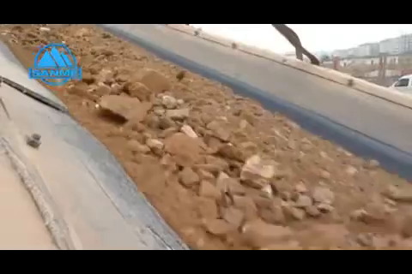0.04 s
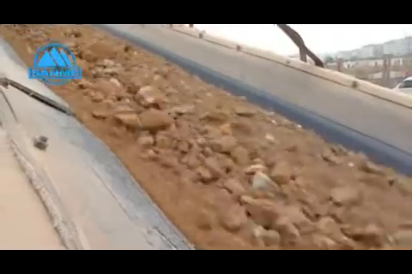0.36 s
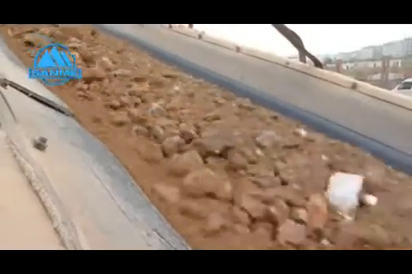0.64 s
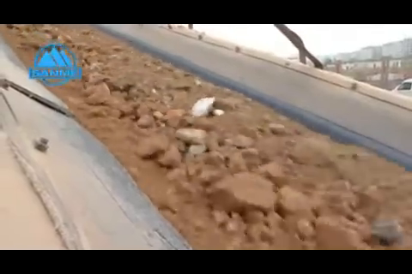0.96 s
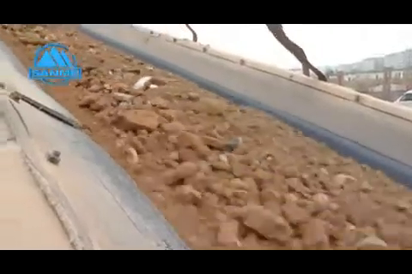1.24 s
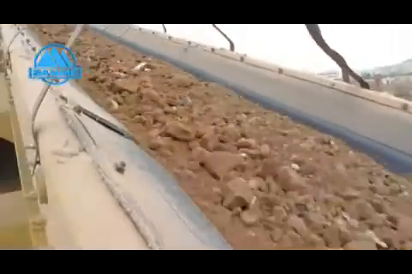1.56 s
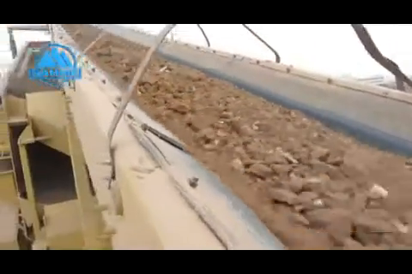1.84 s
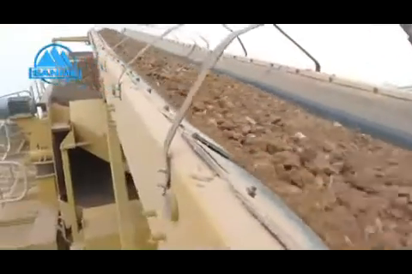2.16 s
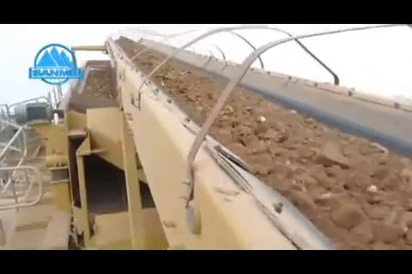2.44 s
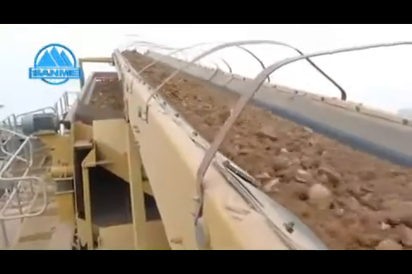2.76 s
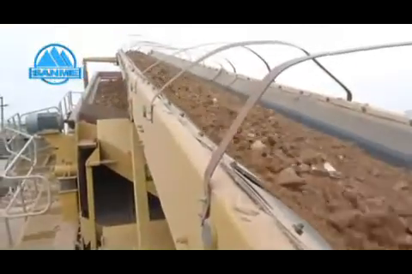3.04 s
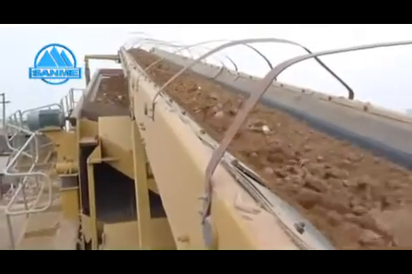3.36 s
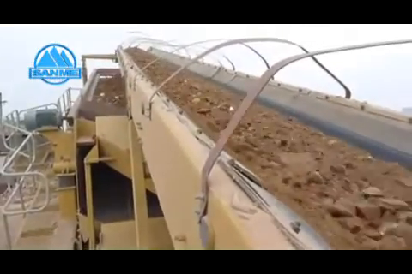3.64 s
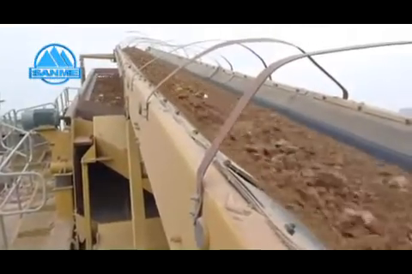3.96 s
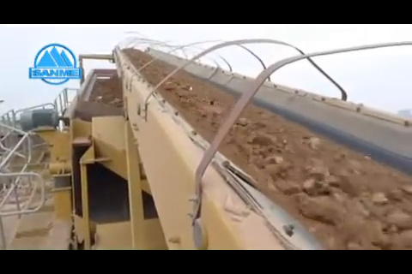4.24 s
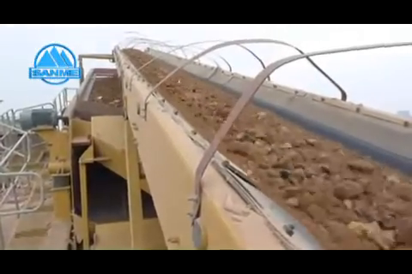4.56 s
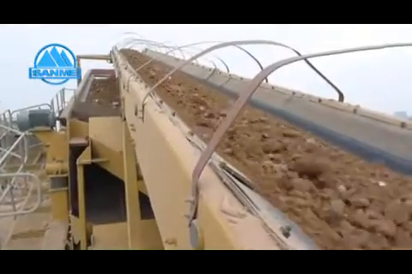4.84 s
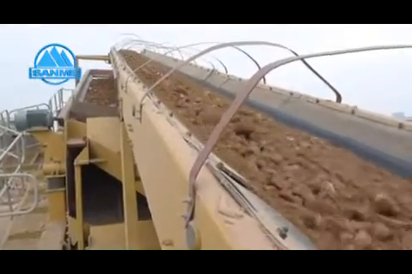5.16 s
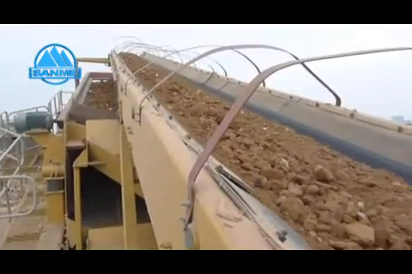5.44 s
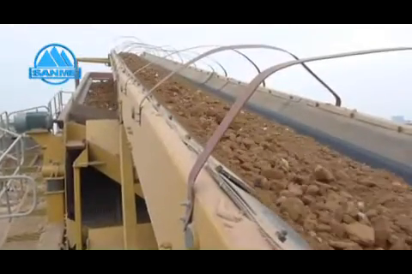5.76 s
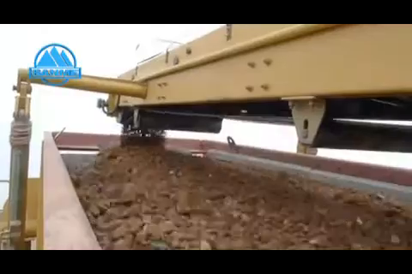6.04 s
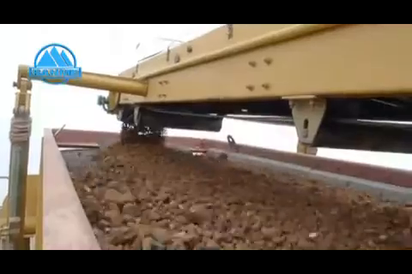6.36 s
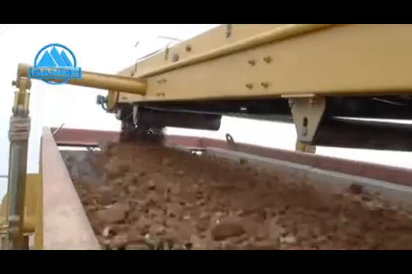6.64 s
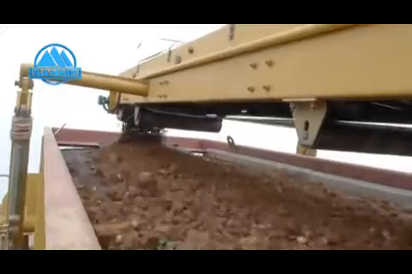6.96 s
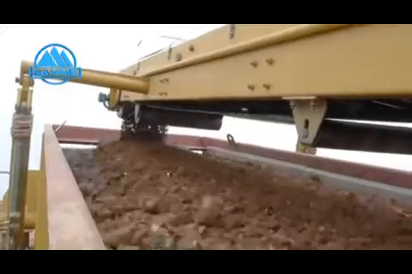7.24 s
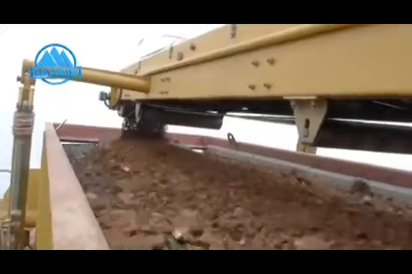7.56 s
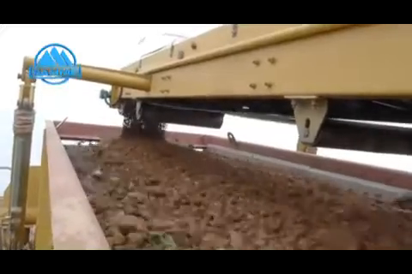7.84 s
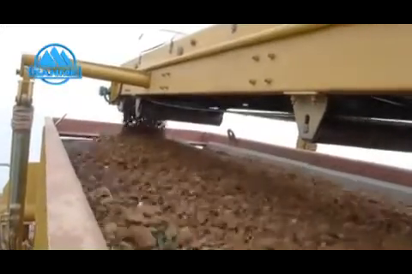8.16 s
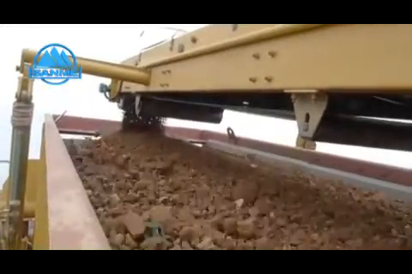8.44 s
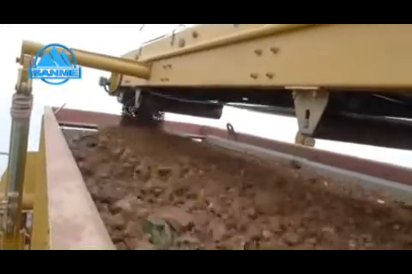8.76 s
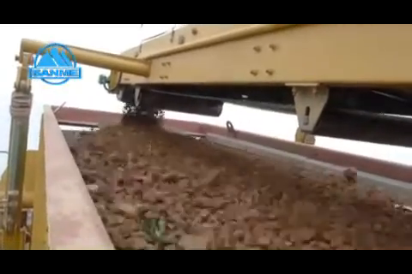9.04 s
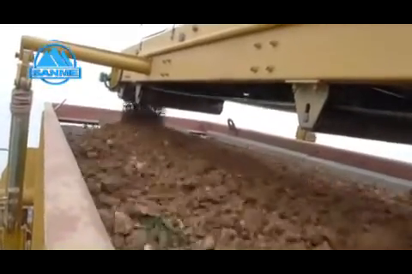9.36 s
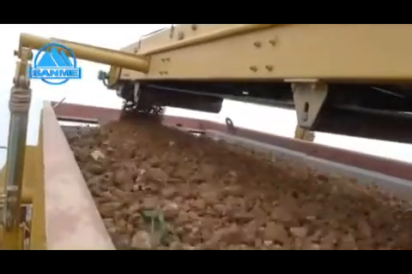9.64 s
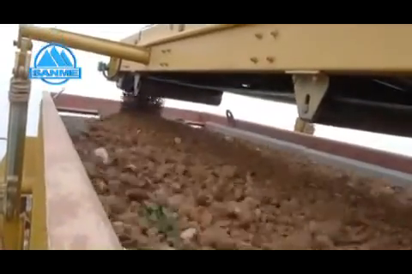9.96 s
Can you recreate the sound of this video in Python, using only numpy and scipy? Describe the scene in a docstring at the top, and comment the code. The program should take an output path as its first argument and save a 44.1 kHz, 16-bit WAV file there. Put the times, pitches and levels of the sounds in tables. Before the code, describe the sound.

A crushing plant roars steadily outdoors while rocks and gravel rattle in a fast rhythm on a shaking steel screen.

```python
"""Rock crusher and shaking screen

A mobile crushing plant, heard beside its feed belt and then, from 6.1 s, close to the vibrating screen.
The screen tosses rubble about 16.6 times a second: rocks drum on the steel box, gravel crackles on the
deck and the mesh jingles, over the crusher's steady roar. By the belt, rollers rumble, the drive drones
and a loose fitting chinks on every second stroke. The sound stutters just before the change of place."""
import sys
import numpy as np
from scipy import signal
from scipy.fft import rfft, irfft, next_fast_len
from scipy.io import wavfile
from scipy.ndimage import uniform_filter1d

SR = 44100
rng = np.random.default_rng(int(sys.argv[2]) if len(sys.argv) > 2 else 0)


def bounce(signal):
    """Save signal as a 16-bit WAV file at the path given by the first command-line argument."""
    frames = np.transpose(np.atleast_2d(signal))
    limited = np.clip(frames, -1, 1)
    pcm = np.round(limited * 32767).astype(np.int16)
    wavfile.write(sys.argv[1], SR, pcm)


N = 440559
TIME = np.arange(N) / SR
STROKE_HZ = 16.58
TURN_S, TURN_LENGTH_S = 1.24, 0.7  # the listener turns from the belt towards the screen
AT_SCREEN_S = 6.097  # the listening place jumps to the screen

# tone of the rubble at the screen and beside the belt: f/Hz, gain/dB
SCREEN_EQ = [(50, -52), (95, -28.5), (190, -20), (280, -6.5), (450, -1.5), (670, -2.5), (850, -5.5),
             (1300, -3.5), (1900, -5), (2600, -5), (4000, -5.5), (5600, -10), (8000, -15), (10000, -20)]
BELT_EQ = [(45, -52), (85, -24.5), (140, -15.5), (240, -7), (420, -1.5), (660, -1), (900, -3.5),
           (1400, -4.5), (2000, -5.5), (2700, -4.5), (4000, -9.5), (5600, -14), (8000, -18.5),
           (10000, -23.5)]
# showers of rubble in a two-stroke cycle, from each place: position/cycle, spread/cycle, weight
SCREEN_SHOWERS = [(.25, 0.11, 0.39), (.42, .075, 0.96), (.94, .085, 1.15)]
BELT_SHOWERS = [(.47, .075, 0.6), (.945, .075, 0.75)]
# big rocks landing on the deck: t/s, relative level/dB
ROCK_HITS = [(0.654, -8), (1.507, -6), (1.615, -3.5), (2.279, -8.5), (2.468, -3.5), (3.669, -6),
             (4.283, -6), (4.621, -5), (5.721, -5), (6.18, -6), (6.502, -10), (6.553, -4.5), (7.477, -5),
             (7.577, -8), (7.829, -6.5), (7.875, -7.5), (8.303, -9), (9.446, -8), (9.763, -9)]
# further chinks of the loose fitting, some louder and some softer than its chatter: t/s, relative level/dB
EXTRA_CHINKS = [(0.6564, -27), (1.7399, -30), (1.7998, -28), (1.9784, -28), (2.6843, -36), (2.8828, -34),
                (3.0036, -33), (3.3059, -28), (3.9694, -34), (4.0896, -33.5), (4.331, -30.5), (4.8733, -29),
                (5.0544, -31), (5.6565, -30)]
# steel resonances of the box walls, the fitting and the mesh: f/Hz, width/Hz, gain/dB
BOX_MODES = [(440, 23, -2), (522.5, 40, 2), (590, 25, -1), (661, 30, 1.5), (818, 33, 0.5), (1065, 90, -0.5),
             (1333, 150, -6.5), (1604, 84, -7), (2080, 130, -5.5), (3560, 180, -11)]
FITTING_MODES = [(2870, 130, -9), (6760, 160, -4), (6870, 170, 1.5)]
MESH_MODES = [(2660, 190, -10.5), (2876, 70, 1), (3100, 56, -11), (3470, 92, -13)]
# drone bands of the drive: f/Hz, resonator width/Hz, level/dB
DRIVE_BANDS = [(218, 8.6, -49), (527.6, 14, -45.5), (646.5, 14, -41)]
# faders for mesh and rollers: level/dB facing the belt, level/dB turned, level/dB at the screen
MESH_LEVELS = (-50, -31, -51)
ROLLER_LEVELS = (-38.5, -47.5, -53)
# brief dips in the din beside the belt: t/s at the bottom, depth/dB, recovery/s
LEVEL_DIPS = [(0.05, 1, 0.44), (0.79, 1.5, 0.56), (1.83, 2, 0.22), (3.31, 1.5, 0.23), (3.89, 1.5, 0.55)]


def rubble_at_screen(roar_db=-22, gravel_db=-25.5, clack_db=-12, box_db=-29):
    """Close to the deck, each toss is a crash of rocks and gravel, and the box rings hollow."""
    rate = landing_rate(SCREEN_SHOWERS, rolling=0.74, uneven_db=1.5)
    stones = undb(clack_db) * stone_clacks(rate)
    rocks = cracks(impacts(2000 * rate, 1.1), t60=0.062) + undb(-1) * rng.standard_normal(N)
    gravel = cracks(impacts(3500 * rate, 1.0), t60=0.036)
    roar, crackle = rubble_bands(SCREEN_EQ, rocks + stones, gravel + stones, crossover_hz=1539)
    walls = unit(steel_box(impacts(3000 * rate, 2.2)))
    return undb(roar_db) * roar + undb(gravel_db) * crackle + undb(box_db) * walls


def rubble_beside_belt(roar_db=-23, turned_roar_db=-24, gravel_db=-24, clack_db=-12, box_db=-36):
    """The crusher's steady roar, with the screen's beat some metres further up the belt."""
    rate = landing_rate(BELT_SHOWERS, rolling=1.0, uneven_db=2)
    stones = undb(clack_db) * stone_clacks(rate)
    rocks = cracks(impacts(1500 * rate, 1.7), t60=0.047) + undb(0.5) * rng.standard_normal(N)
    gravel = cracks(impacts(3000 * rate, 1.1), t60=0.044)
    roar, crackle = rubble_bands(BELT_EQ, rocks + stones, gravel + stones, crossover_hz=1560)
    walls = unit(steel_box(impacts(2000 * rate, 1.5)))
    roar_gain = undb(turn_fade(roar_db, turned_roar_db))
    return roar_gain * roar + undb(gravel_db) * crackle + undb(box_db) * walls


def landing_rate(pattern, rolling, uneven_db):
    """Density of impacts (mean 1): showers as the deck catches its load, some rolling in between."""
    cycle = TIME * STROKE_HZ / 2
    showers = np.zeros(N)
    for position, spread, weight in pattern:
        offset = (cycle - position + .5) % 1 - .5
        showers += weight * np.exp(-.5 * (offset / spread) ** 2)
    rate = rolling + showers * undb(uneven_db * wander(STROKE_HZ))
    return rate / rate.mean()


def rubble_bands(curve, rocks, gravel, crossover_hz, feed_hz=5, feed_db=.2):
    """Heavy rocks fill the lows and small stones the highs; both ride the nearly even feed."""
    feed = undb(feed_db * wander(feed_hz))
    low = unit(split(equalise(rocks, curve), crossover_hz, "low"))
    high = unit(split(equalise(gravel, curve), crossover_hz, "high"))
    return low * feed, high * feed


def stone_clacks(rate, per_s=320, low_hz=600, high_hz=4200, q=18, scatter_db=1.0):
    """Stone on stone: each rings briefly at its own pitch, large ones low and small ones high."""
    longest = 4096  # samples
    out = np.zeros(N + longest)
    landed = np.cumsum(rate) / rate.sum()
    for when, smallness, softness in rng.random((int(per_s * N / SR), 3)):
        hz = low_hz * (high_hz / low_hz) ** smallness
        length = min(int(2 * q * SR / hz), longest)
        cycles = np.arange(length) * hz / SR
        gain = undb(-scatter_db * np.log(max(softness, .03))) * np.sqrt(hz)
        start = np.searchsorted(landed, when)  # clacks bunch up in the showers
        out[start:start + length] += gain * np.sin(2 * np.pi * cycles) * np.exp(-np.pi * cycles / q)
    return unit(out[:N])


def big_rocks(crunch_db=2, box_db=-9, low_hz=700, high_hz=3600):
    """A big rock lands with a dull crunch and knocks on the box."""
    blows = bursts(ROCK_HITS, t60=0.087, rise_s=.014)
    crunch = split(equalise(blows, BELT_EQ), low_hz, "high")
    crunch = split(crunch, high_hz, "low")
    return undb(crunch_db) * crunch + undb(box_db) * steel_box(blows)


def steel_box(blows, low_cut_hz=300):
    """The screen's steel walls ring hollow; they are too small to radiate deep bass."""
    return split(ring(blows, BOX_MODES), low_cut_hz, "high", order=3)


def loose_fitting(first_s=0.097, chatter_db=-33, belt_db=11, turned_db=16):
    """Heard by the belt, a loose steel part chinks every second stroke, with further chinks of uneven strength
    in between."""
    chatter = [(s, chatter_db) for s in np.arange(first_s, AT_SCREEN_S, 2 / STROKE_HZ)]
    blows = bursts([*chatter, *EXTRA_CHINKS], t60=0.059, rise_s=0.0035)
    return undb(turn_fade(belt_db, turned_db)) * ring(blows, FITTING_MODES)


def steel_mesh():
    """Stones strike the mesh mostly as they land, and it jingles."""
    rate = landing_rate(BELT_SHOWERS, rolling=.1, uneven_db=0)
    jingle = ring(impacts(1400 * rate, 2.2), MESH_MODES)
    return unit(jingle) * perspective(*MESH_LEVELS)


def belt_rollers(low_hz=205, high_hz=370):
    """The loaded belt rumbles over its rollers; the sound carries only a short way."""
    rumble = split(rng.standard_normal(N), low_hz, "high", order=3)
    rumble = split(rumble, high_hz, "low", order=4)
    return unit(rumble) * perspective(*ROLLER_LEVELS)


def drive_drone():
    """The drive hums in wavering tones, each made of noise rung twice through a narrow resonance."""
    drone = np.zeros(N)
    for hz, width, db in DRIVE_BANDS:
        mode = [(hz, width, 0)]
        drone += undb(db) * unit(ring(ring(rng.standard_normal(N), mode), mode))
    return drone


def level_dips(fall_s=0.15):
    """Gain that ducks quickly and creeps back at each dip."""
    dips_db = sum(np.interp(TIME, [s - fall_s, s, s + recovery_s], [0, depth_db, 0])
                  for s, depth_db, recovery_s in LEVEL_DIPS)
    return undb(-dips_db)


def perspective(belt_db, turned_db, screen_db):
    """Gain of a source as the listener faces the belt, turns, then stands at the screen."""
    return undb(np.where(TIME < AT_SCREEN_S, turn_fade(belt_db, turned_db), screen_db))


def turn_fade(before_db, after_db):
    """A level that slides as the listener turns towards the screen."""
    return np.interp(TIME, [TURN_S, TURN_S + TURN_LENGTH_S], [before_db, after_db])


def impacts(per_s, scatter_db):
    """Blows at random moments and of uneven strength."""
    struck = rng.random(N) < per_s / SR
    return struck * undb(scatter_db * np.clip(rng.standard_normal(N), -2.5, 2.5))


def cracks(blows, t60):
    """Each blow is a burst of noise that dies away; their energies add."""
    decay = np.exp(-2 * np.log(1000) / (t60 * SR))
    energy = signal.lfilter([1], [1, -decay], blows ** 2)
    return unit(np.sqrt(energy) * rng.standard_normal(N))


def bursts(hits, t60, rise_s):
    """A noise burst with a short attack and a dying tail for each row of t/s, level/dB."""
    blows = np.zeros(N)
    for s, db in hits:
        blows[int(s * SR)] = undb(db)
    decay = np.exp(-np.log(1000) / (t60 * SR))
    tails = signal.lfilter([1], [1, -decay], blows)
    return uniform_filter1d(tails, int(rise_s * SR) + 1) * rng.standard_normal(N)


def wander(rate_hz):
    """Slow drift of rms 1: glides from one random value to the next."""
    hold = int(SR / rate_hz)
    steps = np.repeat(rng.standard_normal(N // hold + 1), hold)
    return unit(uniform_filter1d(steps, hold)[:N])


def ring(x, modes):
    """Excite a bank of resonances: f/Hz, width/Hz, gain/dB."""
    return sum(undb(db) * signal.lfilter(*signal.iirpeak(hz, hz / width, fs=SR), x)
               for hz, width, db in modes)


def equalise(x, curve):
    """Shape the tone along a curve of f/Hz, gain/dB."""
    hz, db = np.transpose(curve)
    size = next_fast_len(N + 8192, real=True)
    bins_hz = np.maximum(np.fft.rfftfreq(size, 1 / SR), 1)
    gain = undb(np.interp(np.log(bins_hz), np.log(hz), db))
    return irfft(rfft(x, size) * gain, size)[:N]


def split(x, hz, side, order=2):
    """Low or high side of a crossover."""
    return signal.sosfilt(signal.butter(order, hz, side, fs=SR, output="sos"), x)


def undb(db):
    """Decibels to gain."""
    return 10 ** (np.asarray(db) / 20)


def unit(x):
    """Scale to rms 1."""
    return x / np.sqrt(np.mean(x ** 2))


def scene():
    """Both listening places in turn, the same in each ear."""
    belt_side = (rubble_beside_belt() + drive_drone()) * level_dips()
    bed = np.where(TIME < AT_SCREEN_S, belt_side, rubble_at_screen())
    plant = bed + belt_rollers() + steel_mesh() + loose_fitting() + big_rocks()
    return np.array([plant, plant])


def record(dry, stutter_s=5.918, loop_s=.04644, notch_hz=7490, top_hz=9900):
    """A short loop stutters up to the change of place; a narrow notch and a steep cut shape the top."""
    start, loop, end = (int(s * SR) for s in (stutter_s, loop_s, AT_SCREEN_S))
    out = dry.copy()
    out[:, start:end] = dry[:, start + np.arange(end - start) % loop]
    out = signal.lfilter(*signal.iirnotch(notch_hz, Q=22, fs=SR), out)
    return signal.sosfilt(signal.ellip(12, .2, 70, top_hz, fs=SR, output="sos"), out)


dry = scene()
out = record(dry)
bounce(out)
```